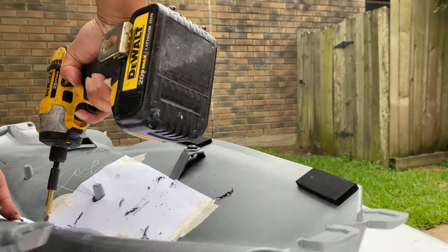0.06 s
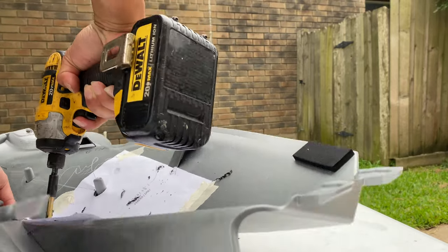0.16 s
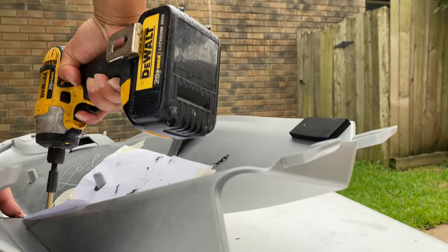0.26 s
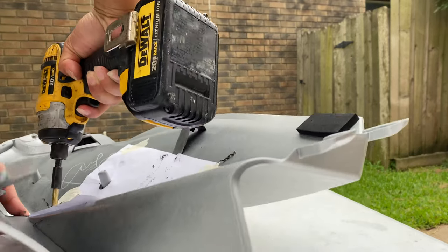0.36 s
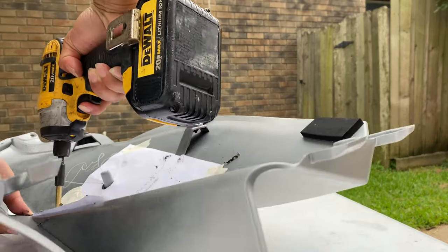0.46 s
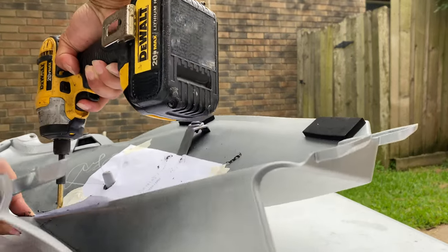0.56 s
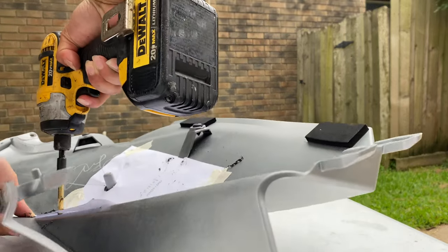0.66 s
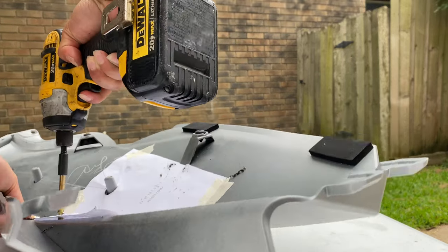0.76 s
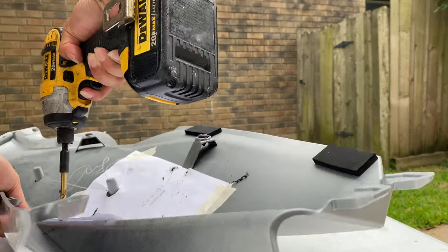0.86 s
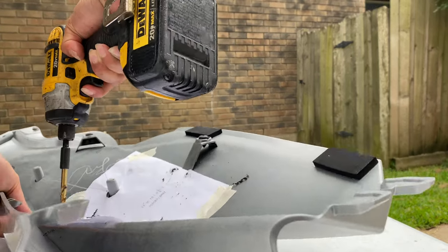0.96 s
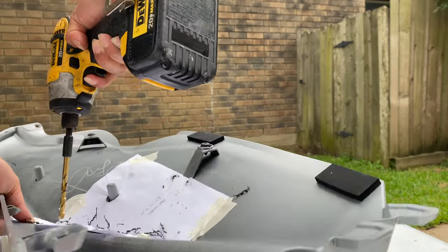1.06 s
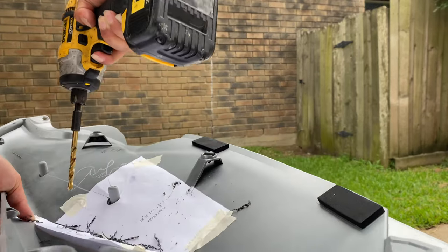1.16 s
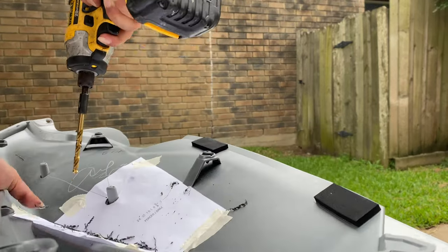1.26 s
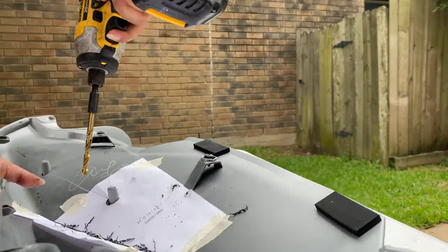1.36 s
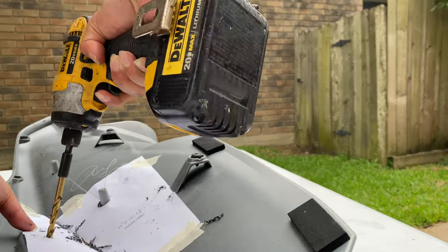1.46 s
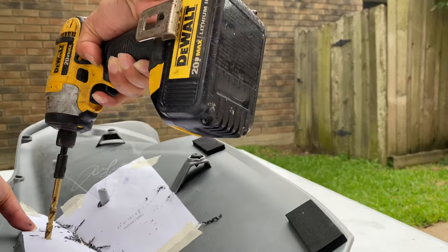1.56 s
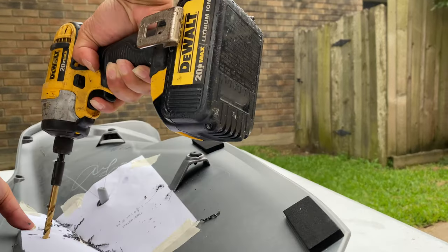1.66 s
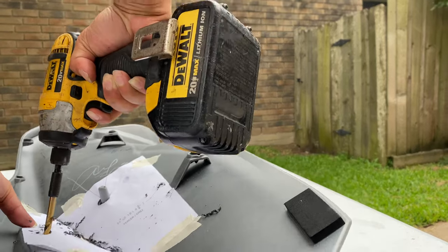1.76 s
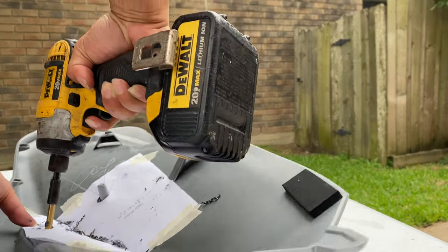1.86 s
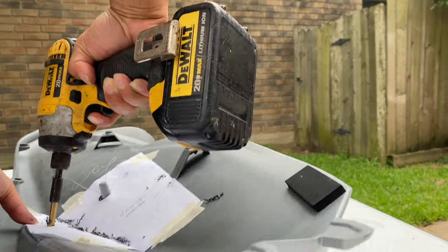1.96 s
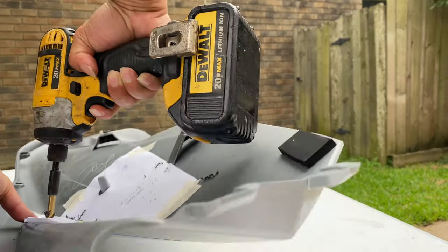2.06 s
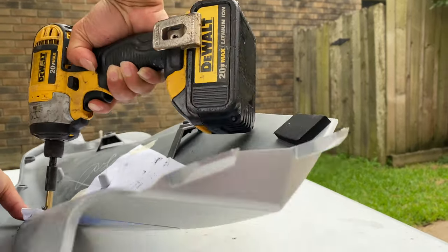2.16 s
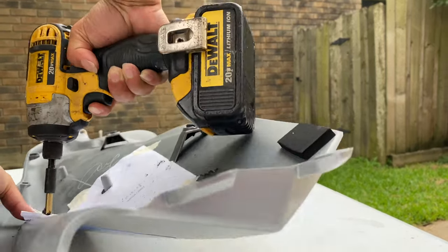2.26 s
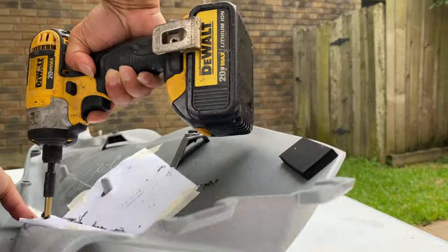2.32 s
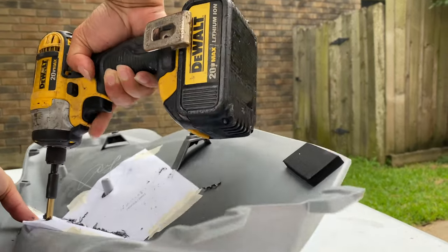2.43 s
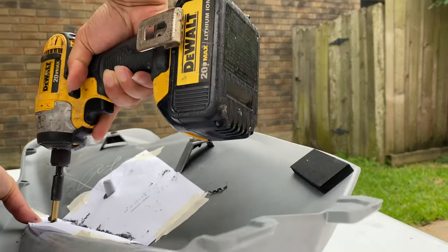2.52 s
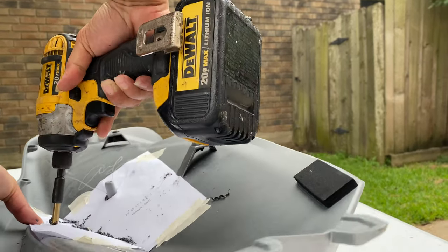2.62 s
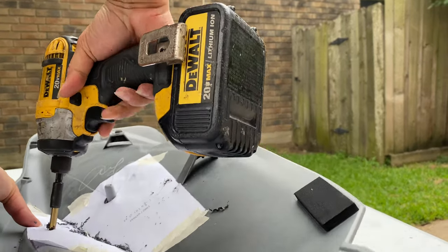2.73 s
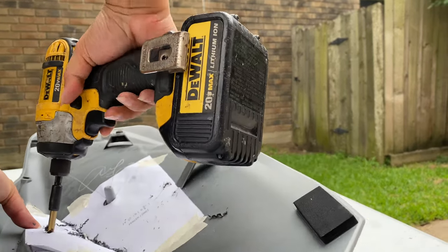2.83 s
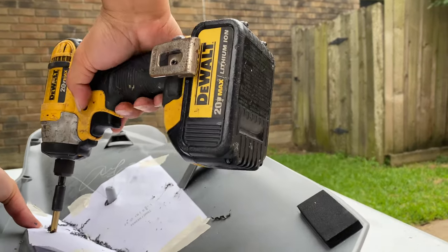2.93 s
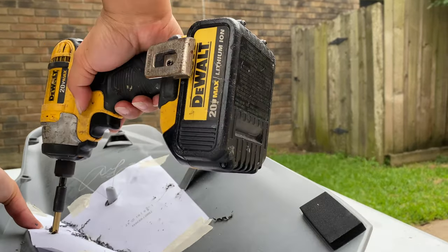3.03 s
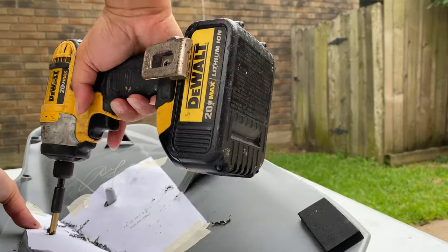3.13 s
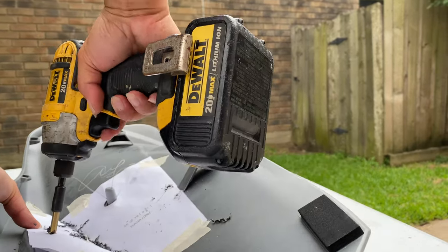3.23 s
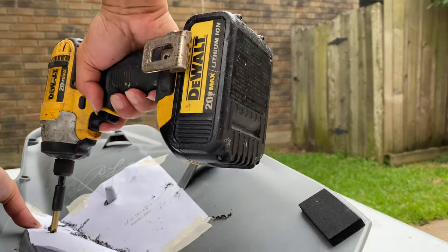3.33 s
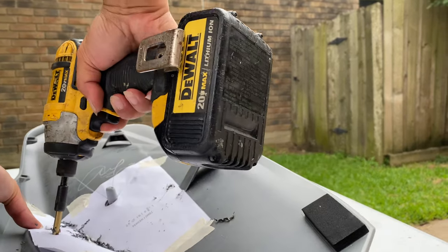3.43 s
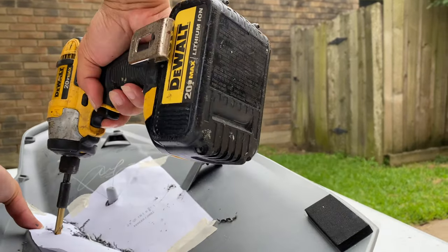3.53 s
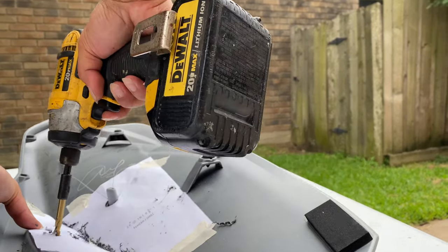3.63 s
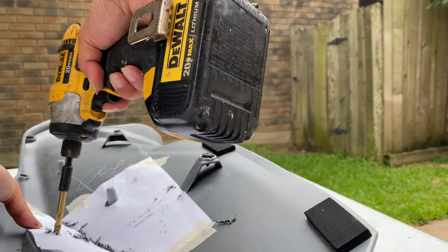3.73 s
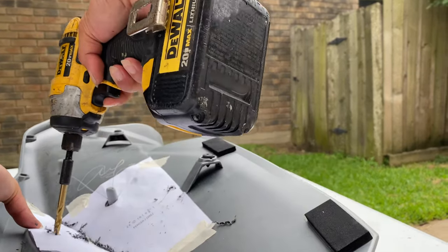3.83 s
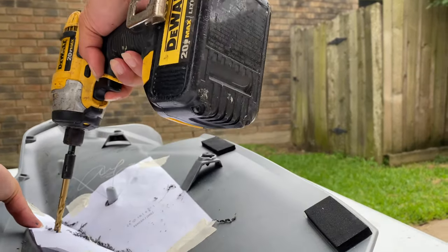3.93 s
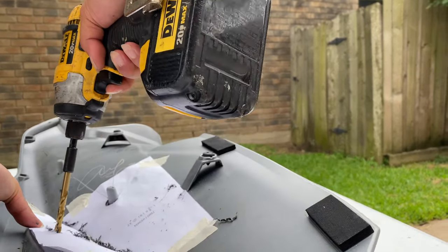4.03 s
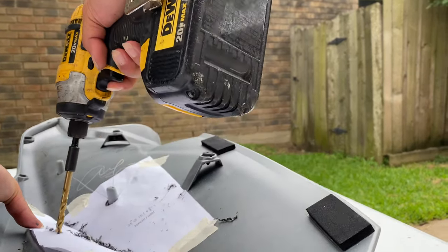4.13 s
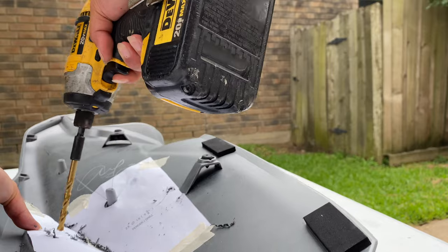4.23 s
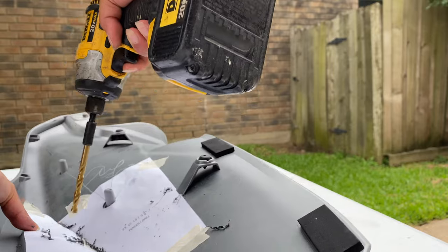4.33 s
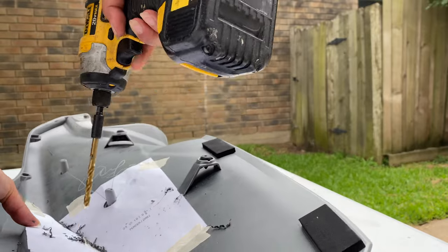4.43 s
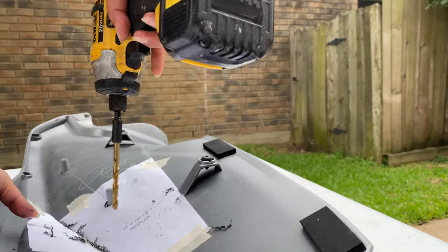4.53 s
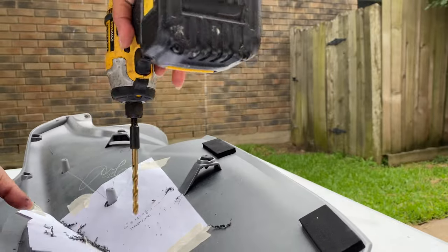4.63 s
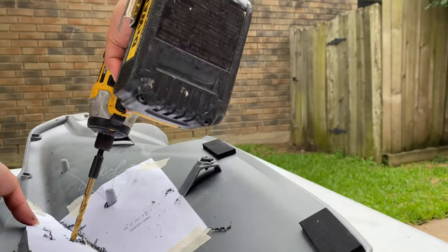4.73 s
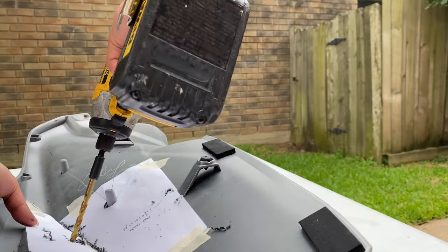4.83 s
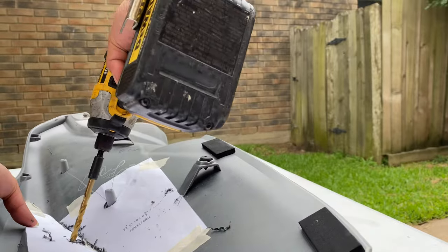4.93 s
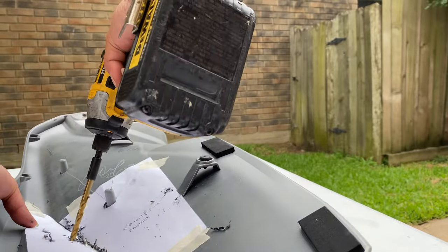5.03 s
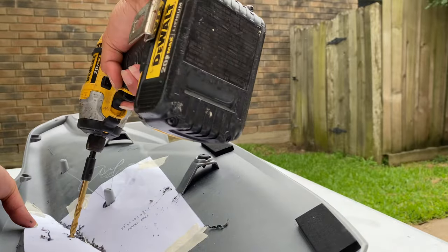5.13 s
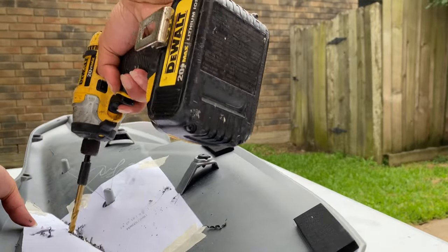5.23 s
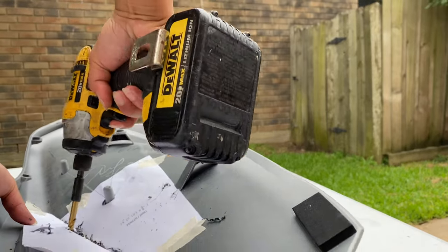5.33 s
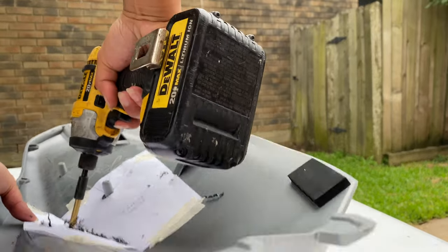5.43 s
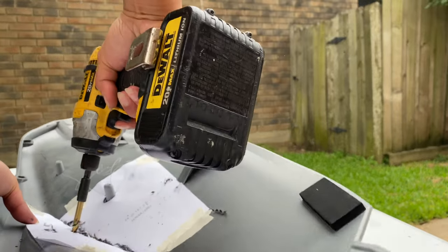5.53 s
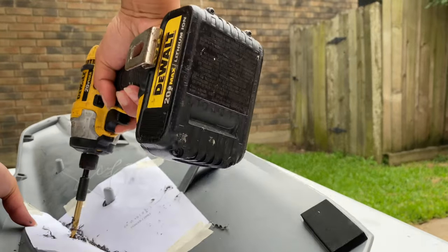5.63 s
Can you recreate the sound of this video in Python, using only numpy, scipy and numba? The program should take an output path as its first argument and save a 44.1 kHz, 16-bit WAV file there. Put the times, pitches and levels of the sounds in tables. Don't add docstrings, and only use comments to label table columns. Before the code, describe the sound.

A cordless drill growls and whines through a plastic panel in short bursts outdoors, with sharp cracks, dull thuds and wind buffeting between.

```python
import sys
import numpy as np
from scipy import signal
from scipy.fft import rfft, irfft
from scipy.io import wavfile
from scipy.ndimage import uniform_filter1d
from numba import njit

SR = 44100
rng = np.random.default_rng(int(sys.argv[2]) if len(sys.argv) > 2 else 0)


def inscribe(sig):
    pcm = np.round(np.clip(np.atleast_2d(sig).T, -1, 1) * 32767)
    wavfile.write(sys.argv[1], SR, pcm.astype(np.int16))


def linear_from_db(decibels):
    return 10 ** (np.asarray(decibels, float) / 20)


N = 250488

# centre_hz, width_hz, level_db
CASE_LOW = [(2522, 250, 1), (2975, 510, 1.37), (3700, 390, 2.85)]
# centre_hz, width_hz, level_db
CASE_HIGH = [(4160, 630, 3), (4994, 770, 4), (5288, 287, 3.5), (5900, 1100, -10), (7220, 2500, -15.5)]
# start_s, contacts_per_s, effort_db
FIRST_HOLE = [(0.0, 308, -36), (0.22, 284, -41.5), (0.39, 325, -42), (0.425, 285, -41.5), (0.72, 370, -41),
              (0.9, 327, -43.5), (1.09, 255, -46), (1.22, 210, -55.5), (1.45, 95, -61.5)]
BREAKTHROUGH = [(1.456, 124.8, -48), (1.482, 91.6, -44.5), (1.59, 104.1, -42.5), (1.64, 216.4, -37.5),
                (1.75, 293.2, -35.5), (1.849, 297.6, -38.5), (1.968, 187, -44.5), (2.1, 152, -58),
                (2.299, 121, -52), (2.38, 111.6, -84)]
FREE_SPIN = [(3.265, 89.65, -57), (3.33, 130.2, -42), (3.481, 347.1, -40.5), (3.53, 483, -39),
             (3.6, 611.9, -37), (3.75, 647, -38), (3.92, 319.7, -45), (4.0, 179.8, -55), (4.04, 128.7, -61)]
BLIP = [(4.045, 110.4, -61.5), (4.1, 378.9, -44), (4.189, 556.2, -42), (4.241, 611, -44),
        (4.33, 528.3, -47), (4.36, 476.4, -60)]
LAST_HOLE = [(4.79, 298.7, -71), (4.901, 403.6, -42.5), (5.0, 431, -37), (5.07, 404, -34.5),
             (5.189, 292.9, -36.5), (5.25, 391.1, -34.5), (5.34, 420.5, -32)]
PULL_OUT = [(5.339, 423.5, -35.5), (5.39, 566, -35.5), (5.45, 657.6, -34.5), (5.53, 704.6, -34),
            (5.601, 607, -35.5), (5.68, 518, -69)]
RUNS = [FIRST_HOLE, BREAKTHROUGH, FREE_SPIN, BLIP, LAST_HOLE, PULL_OUT]
# start_s, crack_peak_db, panel_re_crack_db, contact_ms
TAPS = [(1.1603, -28, -10, 2.3), (1.166, -40.5, 0.5, 6.5), (1.6428, -36, -5, 2), (2.0943, -40.5, 4, 1.4),
        (2.137, -43.5, 15, 0.83), (2.1423, -36, -7, 2.6), (2.152, -44, 1.5, 4.3), (2.247, -33.5, -2.5, 4.8),
        (2.3235, -50, -1, 1.06), (2.7468, -30.5, -6.5, 2.95), (2.762, -58.5, 4, 2.3),
        (2.8388, -42, 0.5, 0.89), (2.863, -52, 2, 1.7), (3.0308, -44, -4.5, 3.4), (3.187, -73, 12.5, 2.4),
        (4.3797, -37, -6, 4.7), (4.7152, -59.5, 4.5, 0.96), (5.6518, -49.5, 6.5, 3.3)]


def rms_one(x):
    return x / np.sqrt(np.mean(x ** 2) + 1e-20)


def in_time(rows, outside=None):
    s, *columns = np.transpose(rows)
    t = np.arange(N) / SR
    return np.array([np.interp(t, s, column, outside, outside) for column in columns])


def gains(tables):
    total = sum(linear_from_db(in_time(rows, outside=-200)) for rows in tables)
    return uniform_filter1d(total, size=88, axis=1)


def band(x, low_hz, high_hz, order=2):
    sos = signal.butter(order, [low_hz, min(high_hz, .45 * SR)], "band", fs=SR, output="sos")
    return signal.sosfilt(sos, x)


def drift(rate_hz):
    r = np.exp(-32 * np.pi * rate_hz / SR)
    white = rng.standard_normal(N // 16 + 3002)
    slow = signal.lfilter([1], [1, -2 * r, r * r], white)[3000:]
    return np.interp(np.arange(N) / 16, np.arange(len(slow)), rms_one(slow))


def body(x, modes):
    out = 0
    for k, (hz, width_hz, level_db) in enumerate(modes):
        r = np.exp(-np.pi * width_hz / SR)
        poles = [1, -2 * r * np.cos(2 * np.pi * hz / SR), r * r]
        ring = signal.lfilter([1 - r * r, 0, r * r - 1], poles, x + 1e-18)
        out = out + (-1) ** k * linear_from_db(level_db) * ring
    return out


def yard():
    # freq_hz, level_db
    yard_colour = [(76, -31), (130, -8), (183, -17.5), (238, -13.5), (285, -6), (796, -10), (1060, -10),
                   (1170, -10), (1860, -9), (2670, -14), (5080, -10), (6870, -20.5), (16000, -38.5)]
    yard_db, hum_hz, hum_db = -65, 238, -73
    hz = np.maximum(np.fft.rfftfreq(N, 1 / SR), 1)
    colour_hz, colour_db = np.transpose(yard_colour)
    colour = linear_from_db(np.interp(np.log(hz), np.log(colour_hz), colour_db))
    noise = rms_one(irfft(rfft(rng.standard_normal(N)) * colour * (hz > 100), N))
    hum = np.sqrt(2) * linear_from_db(hum_db + 0.53 * drift(4)) * np.sin(2 * np.pi * hum_hz * np.arange(N) / SR)
    return linear_from_db(yard_db + 0.5) * noise * linear_from_db(.8 * drift(6.5)) + hum


def wind():
    # peak_s, level_db, decay_s
    gust_rows = [(.2, -48.5, 0.2), (.68, -53, 0.1), (.8, -50, 0.055), (.97, -52.5, 0.12),
                 (1.15, -37, 0.024), (1.21, -35.5, 0.057), (1.351, -31.5, 0.03), (1.429, -33, 0.032),
                 (1.648, -33, 0.039), (1.78, -40, 0.098), (1.87, -28.5, 0.13), (2.14, -43, .04),
                 (2.24, -37.5, 0.12), (2.4, -46.5, 0.24), (2.8, -49.5, 0.071), (2.85, -46, 0.023),
                 (2.93, -38.5, 0.029), (2.99, -47, 0.19), (3.649, -42.5, 0.061), (3.77, -37.5, 0.041),
                 (3.85, -41, 0.11), (4.05, -49.5, 0.091), (4.24, -52.5, 0.062), (4.41, -43.5, 0.067),
                 (5.05, -40.5, 0.16), (5.275, -27, 0.04), (5.34, -27, 0.072), (5.48, -27.5, 0.078),
                 (5.619, -34, 0.053)]
    calm_db, rumble_db, rumble_power, rise_s = -57, -24, 2.3, .025
    t = np.arange(N) / SR
    buffet = linear_from_db(calm_db)
    for s, peak_db, decay_s in gust_rows:
        buffet = buffet + linear_from_db(peak_db) * np.exp(-((t - s) / np.where(t < s, rise_s, decay_s)) ** 2)
    rumble = linear_from_db(calm_db - 15.5) + linear_from_db(rumble_db - 40.5) * (buffet / linear_from_db(-32)) ** rumble_power
    lumps = band(rng.standard_normal(N + SR), 28, 81, order=3)[SR:]
    lumps = lumps / np.sqrt(uniform_filter1d(lumps ** 2, size=7000))
    lumps = lumps * linear_from_db(2.6 * drift(10.0))
    upper = rms_one(band(rng.standard_normal(N + SR), 125, 290)[SR:] * linear_from_db(3.0 * drift(12)))
    return buffet * lumps + rumble * upper


def walls(x):
    t60_s, wall_db, delay_s = .3, -24.0, 0.017
    shares = [(400, 2.8), (800, 0.73), (1600, 1.1), (3200, 0.22), (6400, 0.17)]   # octave_from_hz, share of t60
    out = 0
    for (low_hz, t60_share), white in zip(shares, rng.standard_normal((len(shares), N))):
        r = linear_from_db(-120 / (t60_s * t60_share * SR))
        power = signal.lfilter([1 - r], [1, -r], band(x, low_hz, 2 * low_hz) ** 2)
        late = np.pad(power, (round(delay_s * SR), 0))[:N]
        out = out + np.sqrt(late) * rms_one(band(white, low_hz, 2 * low_hz))
    return linear_from_db(wall_db) * band(out, 300, 7000, order=1)


def shudders():
    # start_s, level_db, rise_s, t60_s, top_hz
    rustle_rows = [
        (1.912, -29, 0.0029, 0.26, 9000),
        (2.215, -52, 0.044, 0.16, 9000),
        (1.233, -53.5, 0.095, 1.1, 6940),
    ]
    stop_s = 1.445
    t, out = np.arange(N) / SR, 0
    grains = rng.standard_normal(N) * linear_from_db(2.7 * drift(200))
    for s, level_db, rise_s, t60_s, top_hz in rustle_rows:
        fall_db = -60 * np.maximum(t - s - rise_s, 0) / t60_s
        shape = np.clip((t - s) / max(rise_s, .001), 0, 1) * linear_from_db(level_db + fall_db)
        if s < stop_s:
            shape = shape * np.clip((stop_s - t) / 0.021, 0, 1)
        out = out + shape * rms_one(band(grains, 4500, top_hz, order=3))
    return out


def thuds():
    # start_s, peak_db, pitch_hz, t60_s
    thud_rows = [(0.19, -37, 152, 0.19), (1.167, -30.5, 244, 0.14), (1.628, -43, 120.6, 0.3),
                 (1.758, -30, 158.9, 0.14), (1.887, -22, 452, 0.14), (2.096, -25, 206, 0.046),
                 (2.139, -31, 431, 0.058), (2.173, -29, 123.2, 0.065), (2.231, -28.5, 430, 0.054),
                 (2.747, -39, 121.7, 0.16), (2.772, -45, 171, 0.033), (2.836, -40.5, 116.5, 0.2),
                 (3.032, -44.5, 169.4, 0.17), (3.348, -37, 437, 0.14), (4.385, -37.5, 149, 0.13),
                 (5.25, -23, 147.3, 0.11), (5.318, -22, 234.7, 0.063)]
    out = np.zeros(N)
    puffs = rng.standard_normal((len(thud_rows), round(.2 * SR)))
    for (s, peak_db, hz, t60_s), puff in zip(thud_rows, puffs):
        t = np.arange(len(puff)) / SR
        shape = (1 - np.exp(-t / 0.019)) * linear_from_db(peak_db - 60 * t / max(t60_s, .03))
        air = 0.59 * rms_one(band(puff, 130, 500))
        out[round(s * SR):][:len(t)] += shape * (np.sin(2 * np.pi * hz * t) + air)
    return out


def table_boom():
    boom_re_panel_db, decay_s = -5.5, 0.016
    shape, t = np.zeros(N), np.arange(round(.08 * SR)) / SR
    for s, peak_db, panel_db, _ in TAPS:
        at = round(s * SR)
        boom = linear_from_db(peak_db + panel_db + boom_re_panel_db) * np.exp(-t / decay_s)
        shape[at:][:len(t)] += boom[:N - at]
    white = rng.standard_normal(N)
    return band(shape * white, 420, 720) / np.std(band(white, 400, 1120))


def knocks():
    # centre_hz, width_hz, level_db
    sheet_modes = [(403, 64, -14), (627, 61, -9.5), (838.5, 67, -5), (1010.4, 260, -7.5), (1427, 120, 2),
                   (1590, 320, -0.5), (1946, 590, -1.5)]
    # start_s, crack_peak_db, panel_re_crack_db, edge_re_crack_db, contact_ms
    slam_rows = [(0.078, -17, -24, -39.5, 3.3), (0.1621, -3, -19.5, -27.5, 1.1),
                 (0.167, -3, -18.5, -12, 6.3), (0.1722, -14, -34, -8.5, 1.2), (0.182, -32, -13, -33, 4.8),
                 (0.6168, -23, -16, -3, 2.7), (1.4642, -20.5, -16.5, -38, 1.11),
                 (1.4731, -26, -18.5, -38, 1.5), (1.6246, -9.5, -18.5, -15, 1.1),
                 (1.6271, -9.5, -22.5, -15.5, 2), (1.788, -16, -13, -28.5, 1),
                 (1.833, -11, -17, -28.5, 1.8), (1.8774, -13, -2, -37.5, 4.6),
                 (1.8873, 13.5, -22, -9, 2.26), (1.8955, 3, -13.5, -21.5, 2.4),
                 (1.9069, 16, -16.5, -12.5, 0.98), (1.9095, -10.5, -9, -22.5, 5.8),
                 (2.225, -29, -17.5, -22, 4.6), (2.2328, -16.5, -5.5, -13, 3),
                 (2.2381, -12, -20, -12.5, 2.14), (2.8871, -11, -25, -4, 0.87),
                 (2.8885, 4, -27, -20.5, 1.54), (3.3508, -9.5, -9.5, -5, 4.25),
                 (4.9008, -8.5, -14, -23, 1.8)]
    # start_s, crack_peak_db
    tick_rows = [(1.128, -33), (1.237, -45), (1.278, -37.5), (1.311, -39.5), (2.1625, -46.5), (2.175, -46),
                 (2.2667, -28.5), (2.2929, -53.5), (2.4038, -32.5), (2.4107, -34.5), (2.505, -40.5),
                 (2.5243, -40), (2.643, -50), (2.8076, -44), (2.823, -40.5), (2.86, -34), (2.8988, -30.5),
                 (2.9203, -29), (3.06, -45.5), (3.221, -36.5), (3.277, -25), (4.292, -31), (4.309, -24),
                 (4.396, -40), (4.42, -45.5), (4.511, -41.5), (4.54, -48), (4.614, -50.5), (4.642, -49.5),
                 (4.7492, -38.5), (4.788, -43)]
    tap_edge_db = -59
    tick_panel_db, tick_edge_db, tick_ms = -16.5, -18.5, 1.88
    taps = [(s, peak_db, panel_db, tap_edge_db, ms) for s, peak_db, panel_db, ms in TAPS]
    ticks = [(s, peak_db, tick_panel_db, tick_edge_db, tick_ms) for s, peak_db in tick_rows]
    shape = np.zeros((3, N))
    for s, peak_db, panel_db, edge_db, ms in slam_rows + taps + ticks:
        t = np.arange(round(.05 * SR)) / SR / (max(ms, .3) / 1000)
        at = round((s + 0.00052) * SR)
        pulse = np.minimum(t / 0.39, 1) * np.exp(-(t / 2.05) ** 2)
        peaks = linear_from_db([[peak_db + panel_db], [peak_db], [peak_db + edge_db]])
        shape[:, at:at + len(t)] += (peaks * [pulse, pulse, pulse ** 3])[:, :N - at]
    rattle = rng.standard_normal((3, N))

    def ringing(resonate, row):
        return resonate(shape[row] * rattle[row]) / np.std(resonate(rattle[row]))

    panel = ringing(lambda x: body(x, sheet_modes), 0)
    crack = ringing(lambda x: band(body(x, CASE_LOW + CASE_HIGH), 2600, 8000, order=3), 1)
    edge = ringing(lambda x: band(x, 6000, 14000), 2)
    return linear_from_db(3.5) * panel + linear_from_db(-8.0) * crack + linear_from_db(-4.0) * edge


def motor():
    # start_s, regular_share (0-1)
    load_rows = [(0, .45), (.25, .55), (.85, .45), (1.1, .12), (1.45, .1), (1.47, .88), (1.59, .8),
                 (1.64, .45), (1.8, .65), (2.0, .05), (3.3, .5), (3.45, .1), (3.8, .12), (4.0, .4),
                 (4.12, .1), (4.4, .1), (4.85, .2), (4.98, .62), (5.2, .65), (5.68, .5)]
    return *in_time(sum(RUNS, [])), in_time(load_rows)[0]


def rotor():
    # start_s, end_s, mesh_rate_ratio, level_db, octave_db
    rotor_rows = [
        (0.5, 1.15, 1.15, -66, -72),
        (3.48, 3.92, 1.0, -58, -65),
        (4.1, 4.33, 1.0, -56, -54),
        (4.225, 4.325, 6.0, -44.5, -90),
    ]
    ease_s = 0.036
    out, turns = 0, 2 * np.pi * np.cumsum(motor()[0]) / SR
    for start, end, ratio, first_db, second_db in rotor_rows:
        ease = gains([[(start, -12), (start + ease_s, 0), (end - ease_s, 0), (end, -6)]])[0]
        tone = linear_from_db(first_db) * np.sin(ratio * turns) + linear_from_db(second_db) * np.sin(2 * ratio * turns)
        out = out + np.sqrt(2) * ease * tone
    return out * linear_from_db(1.5 * drift(25) - 2.0)


def whine():
    # on_s, off_s, whine_db, octave_db, fade_before_off_s
    pull_rows = [
        (-.01, 1.155, -38, -62.5, 0.35),
        (1.455, 2.228, -39.5, -68.5, 0.0098),
        (3.27, 3.901, -42, -70, 0.38),
        (4.03, 4.272, -40.5, -76.5, 0.054),
        (4.789, 5.578, -43, -81, 0.065),
    ]
    whine_hz, third_db, fade_db = 3902.0, -82.5, -9.5
    follows = [[0.56], [-.5], [-.5]]
    phase = 2 * np.pi * np.cumsum(whine_hz + 4.0 * drift(4)) / SR
    held = []
    for on, off, first_db, second_db, fade_s in pull_rows:
        held.append([(on, first_db, second_db, third_db),
                     (off - fade_s, first_db, second_db, third_db),
                     (off, first_db + fade_db, second_db - 8.0, third_db - 6)])
    effort_db = np.maximum(motor()[1], -52) + 42.0
    levels = gains(held) * linear_from_db(follows * effort_db + 1.6 * drift(30))
    return np.sqrt(2) * sum(level * np.sin(k * phase) for k, level in zip((1, 2, 3), levels))


@njit
def glide(x, bend, r):
    out = np.zeros(len(x))
    for i in range(2, len(x)):
        out[i] = (1 - r * r) * (x[i] - x[i - 2]) + 2 * r * bend[i] * out[i - 1] - r * r * out[i - 2]
    return out


def flickering(x, modes, patchy_db):
    grip_shift = .035
    out = 0
    for k, (hz, width_hz, level_db) in enumerate(modes):
        gain = (-1) ** k * linear_from_db(level_db + patchy_db * drift(30))
        bend = np.cos(2 * np.pi * hz / SR * (1 + grip_shift * drift(5.6)))
        out = out + gain * glide(x + 1e-18, bend, np.exp(-np.pi * width_hz / SR))
    return rms_one(out)


def shaken(base_db, octave_db, load_db, depth_db):
    bit_depths = [0.42, 1, 0.26, 0.045, 0.61, 0.71]
    usual_per_s, usual_load = 350, .4
    per_s, _, load = motor()
    efforts = [np.array(rows)[:, ::2] + [0, depth_db * depth] for rows, depth in zip(RUNS, bit_depths)]
    tilt_db = octave_db * np.log2(per_s / usual_per_s) + load_db * (load - usual_load)
    return gains(efforts)[0] * linear_from_db(base_db + tilt_db)


def swell():
    # middle_s, housing_swell_db
    bite_rows = [(0.07, 8.5), (0.274, 8), (.361, 8.5), (.447, 9.5), (0.528, 7.5), (0.608, 6.5), (.693, 5.5),
                 (0.761, 11), (0.834, 9), (1.744, 6), (3.673, 5), (3.729, 6), (3.792, 6.5), (3.854, 6),
                 (3.942, 4), (5.008, 8), (5.075, 5.5), (5.144, 6), (5.254, 5.5), (5.313, 4), (5.36, 4.5),
                 (5.403, -1.5), (5.446, -2)]
    out, n = np.zeros(N), round(0.033 * SR)
    for s, swell_db in bite_rows:
        out[round(s * SR) - n // 2:][:n] += swell_db * signal.windows.tukey(n, .6)
    return out


def teeth(jitter, spread_db, bite_db):
    speed_wobble = .015
    per_s, _, regular = motor()
    turns = np.cumsum(per_s * (1 + speed_wobble * regular * drift(9))) / SR + jitter * drift(75)
    contact = np.diff(np.floor(np.maximum.accumulate(turns)), prepend=0) > 0
    clicks = contact * linear_from_db(spread_db * rng.standard_normal((4, N))) * np.sqrt(SR / per_s)
    return np.sqrt(regular) * clicks * linear_from_db(bite_db), np.sqrt(1 - regular)


def drill():
    # centre_hz, width_hz, level_db
    panel_modes = [(550.5, 1700, -22.5), (790, 63, 5.5), (1050, 170, 3), (1407, 210, 2), (1604, 180, 5.5),
                   (1834, 120, 5), (2280, 200, -0.5)]
    # centre_hz, width_hz, level_db
    chuck_modes = [(4750, 450, 0.), (5150, 450, 0.)]
    panel_lag_s, contact_cut_hz, firm_per_s = .014, 5600, 220
    chips_per_s, chuck_db = 120, 1.5
    bite_db = swell()
    late_bite_db = .5 * np.roll(bite_db, round(panel_lag_s * SR))
    clicks, rub = teeth(jitter=.017, spread_db=2.0, bite_db=late_bite_db + 1.2 * drift(15))
    soft = signal.butter(3, contact_cut_hz, fs=SR, output="sos")
    clicks = signal.sosfilt(soft, clicks)
    clicks[2] *= np.minimum(motor()[0] / firm_per_s, 1)
    drive = 1.3 * clicks + rub * rng.standard_normal((4, N))

    panel = shaken(base_db=-4, octave_db=0.96, load_db=-2, depth_db=3.5)
    panel = panel * flickering(band(drive[0], 1180, 2700, order=3), panel_modes, patchy_db=2.0)
    hollow = shaken(base_db=-17, octave_db=0, load_db=-10.5, depth_db=5.5)
    hollow = hollow * rms_one(band(rng.standard_normal(N), 450, 1250))
    low = shaken(base_db=-0.3, octave_db=1.2, load_db=-3.3, depth_db=-1.3)
    low = low * flickering(drive[1], CASE_LOW, patchy_db=2.0)

    high_gain = shaken(base_db=-0.42, octave_db=0.17, load_db=0.16, depth_db=0.3)
    high = high_gain * flickering(band(drive[2], 3700, 9900), CASE_HIGH, patchy_db=1.2)
    chuck = rms_one(body(body(drive[3], chuck_modes), chuck_modes))
    squeal = high_gain * linear_from_db(chuck_db) * (linear_from_db(bite_db) - 1) * chuck

    puffs = np.minimum(uniform_filter1d(np.abs(clicks[0]), size=40), 2)
    air = rng.standard_normal(N) * (1 + .25 * puffs)
    air = air + (rng.random(N) < chips_per_s / SR) * rng.normal(0, 9.0, N)
    air = rms_one(band(band(air, 5000, 23000, order=3), 6000, 12500, order=1))
    hiss = shaken(base_db=-16.5, octave_db=1.5, load_db=-0.5, depth_db=-5.5)
    hiss = hiss * air * linear_from_db(0.4 * bite_db + 1.5 * drift(40))
    return panel + hollow + low + high + squeal + hiss


def scene():
    blows = knocks() + table_boom()
    background = yard() + wind() + walls(blows)
    handling = shudders() + thuds() + blows
    return (background + handling + rotor() + whine() + drill())[None]


def roll_off(x):
    return signal.sosfilt(signal.butter(12, 16300, fs=SR, output="sos"), x)


def record(dry):
    converter = signal.cheby2(8, 30, 16350, fs=SR, output="sos")
    mix = signal.sosfilt(converter, np.clip(dry, -1, 1))
    return roll_off(np.clip(mix, -1, 1))


dry = scene()
out = record(dry)
inscribe(out)
```